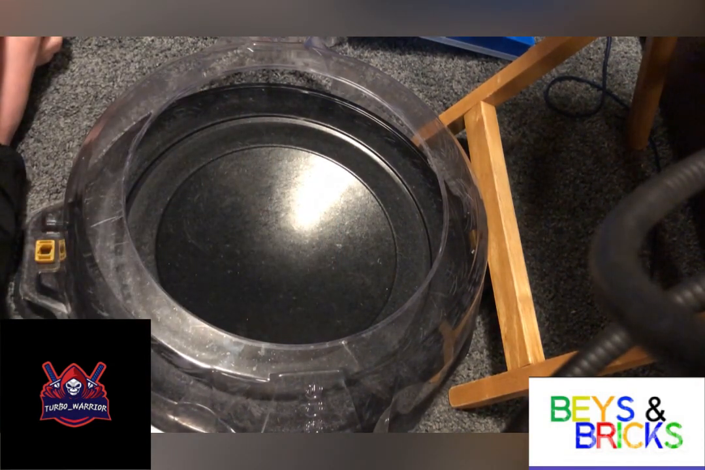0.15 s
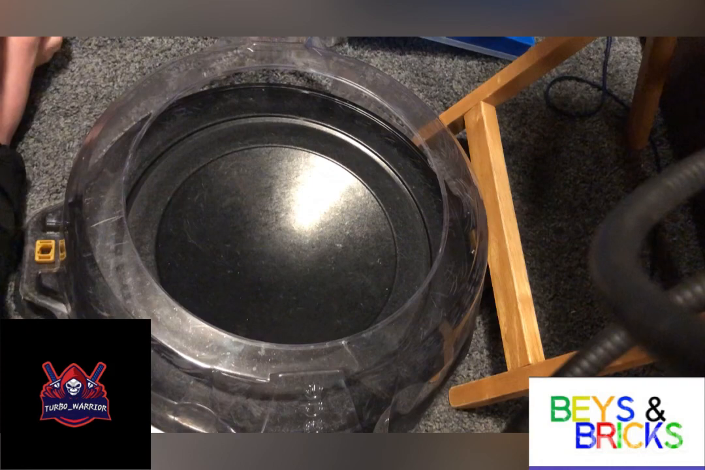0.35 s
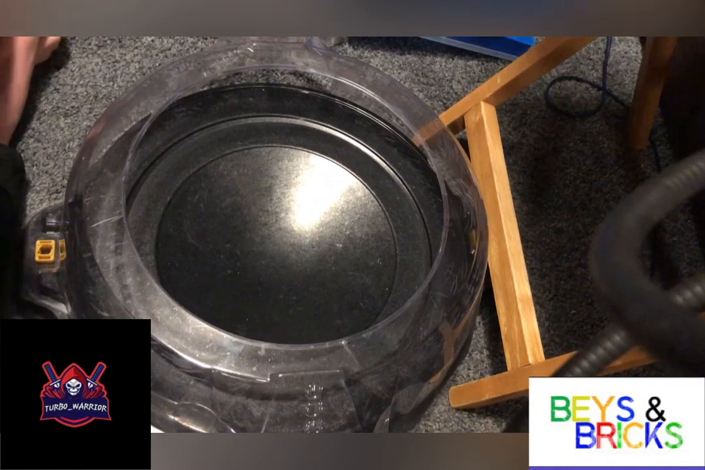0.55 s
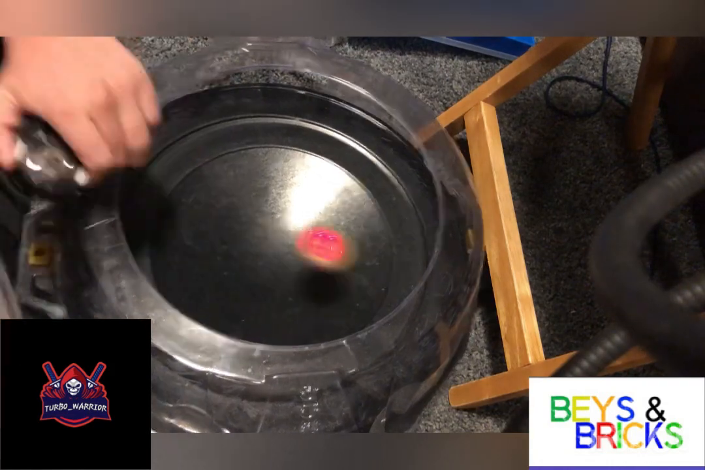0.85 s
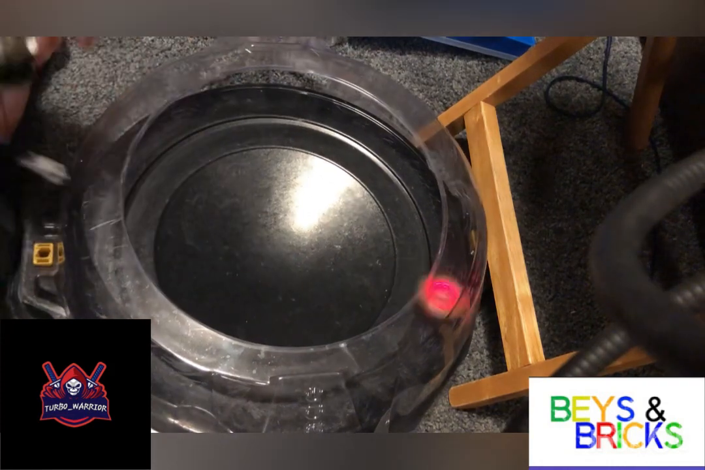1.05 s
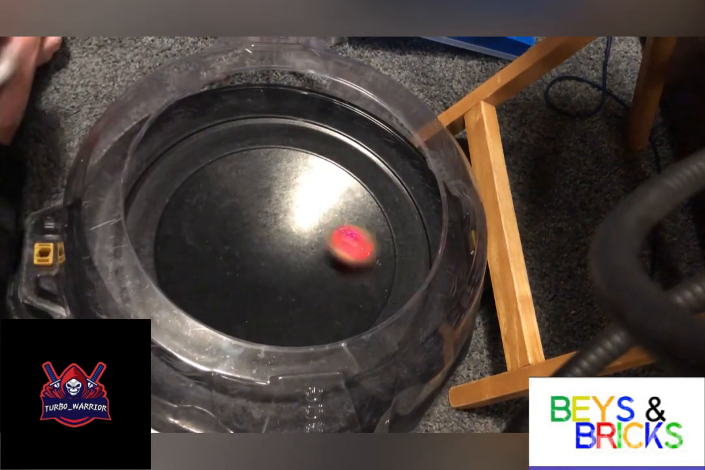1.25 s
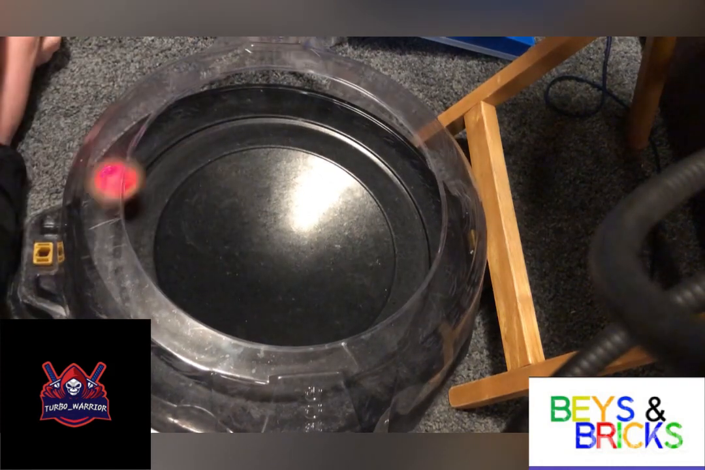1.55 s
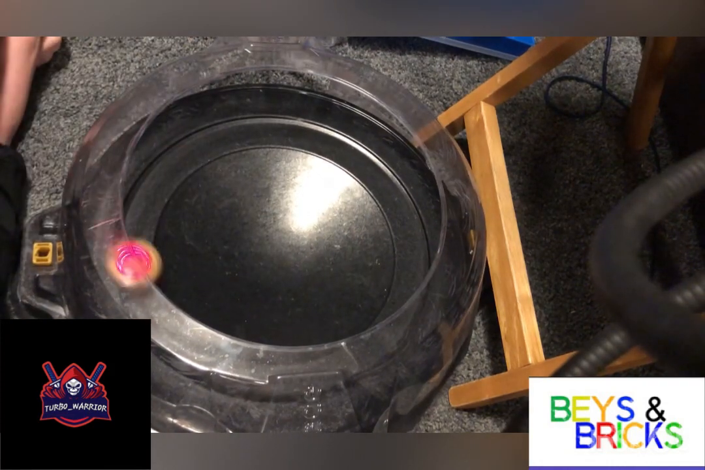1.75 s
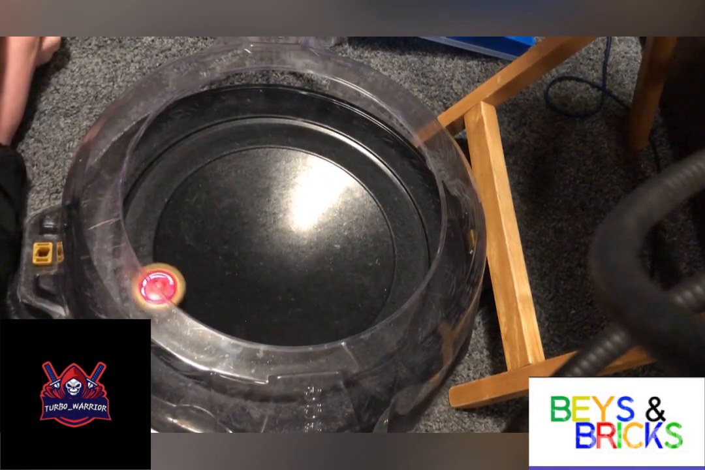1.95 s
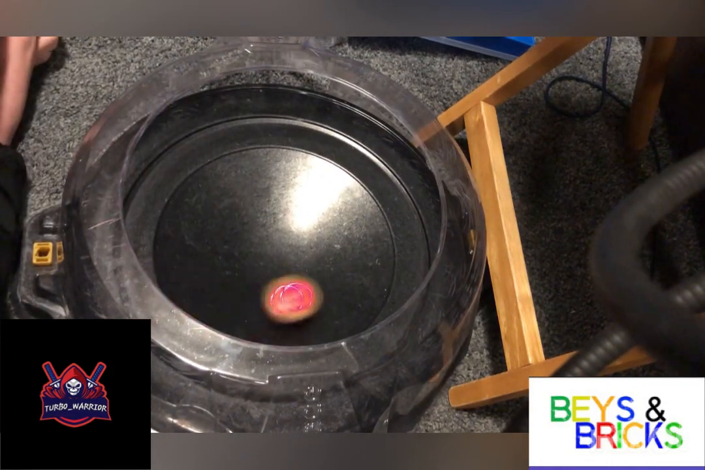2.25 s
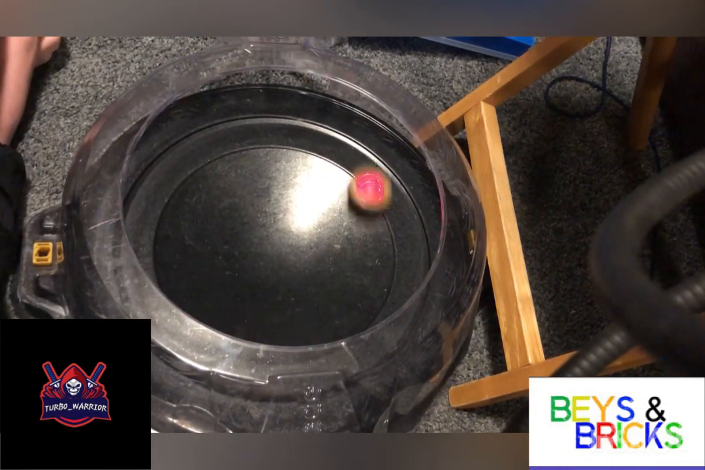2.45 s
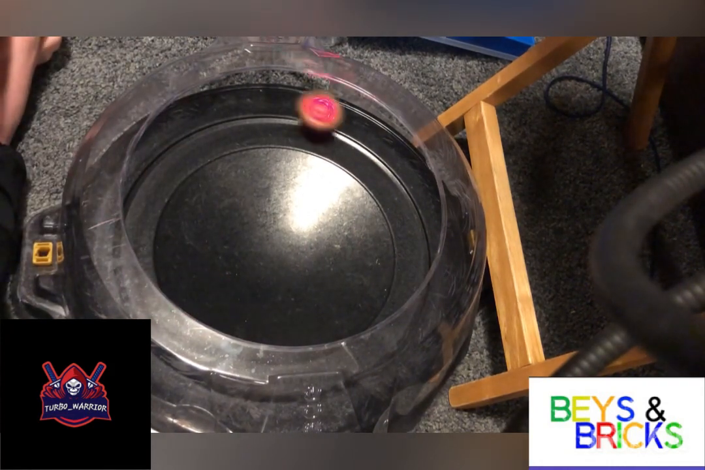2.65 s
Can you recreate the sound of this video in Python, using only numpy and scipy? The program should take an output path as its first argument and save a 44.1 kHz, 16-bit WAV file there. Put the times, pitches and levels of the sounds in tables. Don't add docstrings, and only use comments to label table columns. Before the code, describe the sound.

A single spinning top is clicked onto a launcher, zipped off with a harsh cord rip, bounces loudly in a thin plastic bowl, then circles with ticks and scrapes; quiet room, close microphone, loudest hits distorting.

```python
import sys
import numpy as np
from scipy import signal
from scipy.fft import rfft, irfft
from scipy.io import wavfile
from scipy.ndimage import uniform_filter1d

SR = 44100
rng = np.random.default_rng(int(sys.argv[2]) if len(sys.argv) > 2 else 0)


def field_ratio(decibels):
    return 10 ** (np.asarray(decibels, dtype=float) / 20)


def int16_out(signal):
    q = np.round(np.clip(np.atleast_2d(signal).T, -1, 1) * 32767)
    wavfile.write(sys.argv[1], SR, q.astype(np.int16))


N = 123479

# f/Hz, density/dB
AIR_SPECTRUM = [(15, -61.5), (25, -19.5), (123, -1), (170, -14.5), (293, -9), (531, -16), (12500, -32.5),
                (16000, -40)]
AIR_DB = -59

# t/s, level/dB, pitch f/Hz, contact/s
CLICKS = [(0.012, -19, 3600, 0.014), (0.0226, -2, 3600, 0.0018), (0.0719, -22, 1990, 0.0023),
          (0.105, -23, 3040, 0.0023), (0.123, -27.5, 2090, 0.0037), (0.4986, -25.5, 3120, 0.0046),
          (0.537, -25, 2030, 0.0044), (0.5592, -26, 3300, 0.0062), (0.5684, -18, 3130, 0.0073),
          (0.5878, -18, 2530, 0.012), (0.609, 2.5, 4000, 0.0046), (0.6213, 3, 3480, 0.0018),
          (0.629, 6.5, 3960, 0.0039), (0.7305, 9, 3360, 0.0062), (0.8968, 0, 4160, 0.0026),
          (0.903, -3, 3740, 0.004), (0.9165, -8, 3800, 0.0032), (0.931, 0, 3030, 0.0022),
          (1.17, 13, 5280, 0.0016), (1.2133, -28, 3930, 0.002), (1.921, -26, 2600, 0.003),
          (1.9591, -6.5, 3290, 0.0038), (2.052, -17.5, 3260, 0.0015), (2.0997, -14, 3600, 0.0067),
          (2.178, -21, 3950, 0.0021), (2.224, -25, 4280, 0.0045), (2.4663, -35, 4240, 0.0027)]
CLICK_RING_DB, CLICK_WIDTH_HZ = -0.5, 2300

# f/Hz, T60/s
ROOM_T60 = [(150, 0.18), (4000, 0.33), (12000, 0.17)]
ROOM_DB = -12.5

# t/s, f/Hz, level/dB
SQUEAK = [
    (.592, 8650, -26),
    (.597, 8780, -12.5),
    (.600, 8690, -12),
    (.602, 9250, -2.5),
    (.605, 9640, -15),
    (.609, 9810, -3.5),
    (.613, 10000, 7),
    (.616, 10200, -49.5),
]

# t/s, rasp level/dB, gear teeth f/Hz
PULL = [
    (.606, -46.5, 1406),
    (.622, -28.5, 1850),
    (.655, -11.5, 3180),
    (.672, -10, 3664),
    (.69, -8.5, 5610),
    (.725, -10, 6200),
    (.738, -6, 6150),
    (.748, -42, 6070),
    (.80, -59, 5070),
]
# t/s, level/dB
RUNOUT = [
    (.84, -47),
    (.90, -21),
    (.935, -27.5),
    (.97, -40.5),
    (1.04, -28),
]
# f/Hz, density/dB
RASP_SPECTRUM = [(290, -82), (500, -30.5), (960, -10.5), (1440, -19), (3590, -4), (10400, -4.5),
                 (16000, -12.5)]
# t/s, f/Hz
HOUSING = [
    (.686, 4130),
    (.708, 2550),
    (.714, 3240),
    (.76, 3540),
]
GEAR_DB, GEAR_WIDTH_HZ, GEAR_OFF_S = -3.5, 170, 0.692
PINION_DB, PINION_RATIO, PINION_OFF_S = -5, 0.41, 0.648
COG_BLUR_HZ, CLUMP_DB, HOUSING_DB = 2860, 2, -7
RUNOUT_HZ, RUNOUT_RING_DB = 3600, -1

# t/s, crack level/dB, wall level/dB, drum level/dB, liveliest wall mode f/Hz
BLOWS = [(0.7771, 1.5, -6.5, 5, 565), (0.7951, -6.5, -6, -2, 554), (0.809, -21, -9, -7, 530),
         (0.9741, -10.5, -11, -4.5, 477), (1.0542, 2.5, 2, -16, 2320), (1.058, -15, 1, -20, 1070),
         (1.066, -5.5, -5, -4, 560), (1.142, -37, -21, -18, 423), (1.1785, -34, -18.5, -23, 435),
         (1.226, -25, -24.5, -23, 505), (1.297, -8.5, -43, -27, 2600), (1.3017, -10.5, -53, -21, 2580),
         (1.4743, -28.5, -15.5, -17, 520), (1.523, -11.5, -7.5, -18.5, 670), (1.5279, -11, -11, -38, 980),
         (1.621, -13, -14.5, -24, 630), (1.6322, 4.5, 2, -10.5, 2080), (1.6531, -15, -6.5, -37, 1200),
         (2.045, -53, -26.5, -58, 456), (2.065, -52.5, -25, -56, 485), (2.483, -53, -26, -39, 506),
         (2.493, -48, -26.5, -36, 590), (2.5, -26, -17, -35, 590), (2.531, -36, -29, -37, 1500),
         (2.5325, -25, -23, -18.5, 440), (2.601, -37, -25.5, -25, 586), (2.6141, -13, -11.5, -51, 1340),
         (2.62, -13, -13.5, -32, 1100), (2.631, -37, -16.5, -34, 467), (2.642, -30, -18.5, -40, 535),
         (2.664, -52, -21.5, -48, 440), (2.685, -54, -27.5, -47, 443)]
# f/Hz, level/dB
DRUM_MODES = [(80, -17), (105, -10), (142, -4), (190, -2.5), (230, 2), (290, 5.5), (330, 4.5), (380, 2.5)]
# f/Hz, level/dB
WALL_MODES = [(440, 0), (510, -0.5), (580, 1.5), (650, -10.5), (750, -1.5), (860, -1.5), (1000, 1.5),
              (1115, 6), (1240, 5.5), (1550, -5.5), (1760, -3), (2090, 6), (2280, 6), (2650, -16.5)]
# f/Hz, density/dB
CRACK_SPECTRUM = [(600, -25), (1500, -4.5), (3000, -4.5), (5800, -5.5), (9000, -10.5), (16000, -8)]
CONTACT_S, RATTLE_DB, RATTLE_T60_S = 0.0046, -23.5, 0.018
FOCUS_DB, FOCUS_OCTAVES, DULL_DB_PER_OCTAVE = 7.5, 0.28, 5.5
DRUM_T60_S, DRUM_LAG_CYCLES, DRUM_T60_PER_DB = 0.16, 0.4, 0.031
WALL_T60_S, WALL_LAG_CYCLES, WALL_T60_PER_DB = 0.09, 2.27, 0.34
CLUSTER_SPREAD, HIGH_DIES_FASTER, IN_STEP = 0.05, 0.6, 0.4
CYCLES_TO_RISE, QUICK_CYCLES, LINGERS = 0.62, 2.6, 0.3

# t/s, level/dB
TICKS = [(.831, -4), (.8542, -8.5), (1.0187, -9), (1.047, -4), (1.2386, -14.5), (1.273, -21), (1.293, -17),
         (1.331, -10), (1.352, -7), (1.373, -8), (1.3939, -7), (1.403, -8), (1.4252, -12.5), (1.448, -20),
         (1.47, -23), (1.807, -36), (1.823, -33), (1.9865, -24), (2.3218, -20), (2.333, -15), (2.3458, -12),
         (2.357, -17), (2.37, -14), (2.394, -12.5), (2.417, -24), (2.499, -18.5), (2.5346, -12),
         (2.575, -28), (2.6234, -6), (2.632, -15), (2.6503, -13), (2.672, -30), (2.711, -29.5)]
# t/s, level/dB
GRAZES = [
    (1.479, -15),
    (1.551, -21),
    (1.5722, -17.5),
    (1.588, -28),
    (1.608, -23),
    (1.687, -19),
    (1.706, -17.5),
    (1.728, -19),
    (1.749, -18),
    (2.541, -21),
]
TICK_S, GRAZE_S, TICK_HZ, TICK_RING_DB = 0.0017, 0.0035, 6690, 5

# t/s, roll level/dB, scrape level/dB, wobble level/dB
ROLL = [(.85, -25.5, -35, -52), (.96, -38.5, -56, -67), (1.10, -37, -29.5, -43), (1.26, -41.5, -52, -60),
        (1.32, -32.5, -35, -35.5), (1.44, -30, -38, -36.5), (1.51, -51, -59, -61),
        (1.72, -23.5, -41.5, -46), (1.86, -54, -56, -53), (2.03, -52.5, -49.5, -67.5),
        (2.07, -34.5, -46, -50), (2.22, -42, -48, -48), (2.36, -40, -40.5, -36.5), (2.50, -35, -44.5, -37),
        (2.522, -57, -66, -67), (2.57, -46, -48.5, -49), (2.66, -35.5, -66.5, -48.5),
        (2.8, -53.5, -62, -57)]
# t/s, wall level/dB
WALL_SHARE = [
    (.85, -6),
    (1.5, -3),
    (1.7, -5),
    (2.05, -1),
    (2.35, -1),
    (2.48, 2.5),
]
# f/Hz, density/dB
SCRAPE_SPECTRUM = [(410, -52), (700, -8), (1580, -2.5), (4380, -15), (6830, -14.5), (16000, -23.5)]
# f/Hz, level/dB
TIP_MODES = [(2200, -25), (4150, -10)]
TIP_WIDTH_HZ, SCRAPE_FLOOR = 400, 0.9
SPIN_HZ, SPIN_LOSS_HZ_PER_S = 108.4, 10.5
UNEVEN_DB, ROLL_NOISE = 2.5, 1.2
CHATTER_DB, CHATTER_SPREAD_DB = -29, 3.5
LIMP_DB, LIMP_END_S, WOBBLE_SECOND_DB, WAVER_DB = 4.5, 1.4, 4, 2

MIC_LOW_HZ, EDGE_HZ, CEILING = 59, 15800, 0.99


def evened(x):
    return x / np.sqrt(np.mean(x ** 2) + 1e-20)


def curve(rows, col=1):
    rows = np.array(rows)
    return np.interp(np.arange(N) / SR, rows[:, 0], rows[:, col])


def during(rows):
    t = np.arange(N) / SR
    gate = 1. * (t > rows[0][0]) * (t < rows[-1][0] + .001)
    return uniform_filter1d(gate, size=200)


def coloured(x, points):
    f, db = np.transpose(points)
    bins_hz = np.fft.rfftfreq(len(x), 1 / SR)
    gain = field_ratio(np.interp(np.log(bins_hz + 1), np.log(f + 1), db))
    return irfft(rfft(x) * evened(gain), len(x))


def add(mix, start_s, sound):
    part = mix[round(start_s * SR):][:len(sound)]
    part += sound[:len(part)]


def resonate(x, hz, width_hz):
    turn = np.exp(2j * np.pi * np.cumsum(hz * np.ones(len(x))) / SR)
    r = np.exp(-np.pi * width_hz / SR)
    return 2 * (turn * signal.lfilter([1 - r], [1, -r], x / turn + 1e-18)).real


def resonate_twice(x, hz, width_hz):
    return resonate(resonate(x, hz, width_hz), hz, width_hz)


def burst(contact_s, size=6000):
    t = np.arange(size) / SR / max(contact_s, 1e-4)
    return rng.standard_normal(size) * np.exp(-t) * (1 - np.exp(-4 * t)) ** 2


def air():
    return field_ratio(AIR_DB) * coloured(rng.standard_normal(N), AIR_SPECTRUM)


def clicks():
    out = np.zeros(N)
    for s, db, hz, contact_s in CLICKS:
        spectrum = [(hz / 12, -30), (hz / 3, -7), (hz, 0), (16000, -3.5 * np.log2(16000 / hz))]
        puff = coloured(burst(contact_s, size=2000), spectrum)
        hollow = field_ratio(CLICK_RING_DB) * resonate(puff, hz, CLICK_WIDTH_HZ)
        add(out, s, field_ratio(db - 12.5) * (puff + hollow))
    return out


def room(x, count=3):
    hz, t, z = signal.stft(rng.standard_normal((count, SR // 2)), SR, nperseg=256)
    f, t60 = np.transpose(ROOM_T60)
    t60_s = np.interp(np.log(hz + 1), np.log(f), t60)[:, None]
    tail = signal.istft(z * field_ratio(-60 * t / t60_s), SR, nperseg=256)[1]
    tail = tail * np.minimum(np.arange(tail.shape[1]) / 300, 1)
    cycle = np.arange(N) / 500 + np.arange(count)[:, None] / count
    share = np.cos(2 * np.pi * cycle) * np.sqrt(2 / count)
    echoes = signal.fftconvolve(x * abs(share), tail / np.linalg.norm(tail[0]), axes=1)
    return echoes[:, :N].sum(axis=0)


def squeak():
    tone = np.sin(2 * np.pi * np.cumsum(curve(SQUEAK)) / SR)
    return field_ratio(curve(SQUEAK, col=2)) * tone * during(SQUEAK)


def launcher():
    t = np.arange(N) / SR
    noise = rng.standard_normal((4, N))
    clumps = field_ratio(CLUMP_DB * evened(uniform_filter1d(noise[0], size=120)))
    teeth_hz = curve(PULL, col=2)

    jolts = np.cos(2 * np.pi * np.cumsum(teeth_hz) / SR / 10)
    cogs = 1 + np.exp(-(teeth_hz / COG_BLUR_HZ) ** 2) * jolts
    rasp = evened(coloured(noise[1] * (.5 + cogs ** 2), RASP_SPECTRUM) * clumps)

    whine = np.zeros(N)
    for hz, db, off_s in [(teeth_hz, GEAR_DB, GEAR_OFF_S),
                          (PINION_RATIO * teeth_hz, PINION_DB, PINION_OFF_S),
                          (1.55 * teeth_hz, -10, .685)]:
        engaged = np.clip((off_s - t) / 0.017, .15, 1)
        whine += field_ratio(db) * evened(resonate_twice(noise[2], hz, GEAR_WIDTH_HZ)) * engaged * clumps

    housing = evened(resonate(noise[3], curve(HOUSING), 350))
    housing = field_ratio(HOUSING_DB) * during(HOUSING) * housing
    loose = evened(resonate(noise[3] * clumps, RUNOUT_HZ, 880))
    pull = field_ratio(curve(PULL)) * during(PULL) * (rasp + whine + housing)
    runout = field_ratio(curve(RUNOUT)) * during(RUNOUT) * (rasp + field_ratio(RUNOUT_RING_DB) * loose)
    return pull + runout


def ring(modes, t60_s, lag_cycles, spread_db=2, count=4):
    t = np.arange(9000) / SR
    chance = rng.uniform(-1.18, 1, (len(modes) * count, 3))
    level_chance, pitch_chance, phase_chance = chance.T[:, :, None]
    hz, db = np.repeat(modes, count, axis=0).T[:, :, None]
    t = np.maximum(t - lag_cycles / hz, 0)
    decay_db = 60 * t / t60_s * (hz / np.median(hz)) ** HIGH_DIES_FASTER
    fall = field_ratio(db + spread_db * level_chance - decay_db)
    fall = fall * (LINGERS + (1 - LINGERS) * np.exp(-t * hz / QUICK_CYCLES))
    rise = 1 - np.exp(-t * hz / CYCLES_TO_RISE)
    phase = 2 * np.pi * hz * (1 + CLUSTER_SPREAD * pitch_chance) * t + np.pi * IN_STEP * phase_chance
    x = (fall * rise * np.sin(phase)).sum(axis=0)
    return x / abs(x).max()


def blows():
    out, t = np.zeros(N), np.arange(6000) / SR
    wall_hz, wall_db = np.transpose(WALL_MODES)
    for s, crack_db, knock_db, drum_db, focus_hz in BLOWS:
        rattle = field_ratio(RATTLE_DB - 60 * t / RATTLE_T60_S) * rng.standard_normal(len(t))
        rattle = rattle * (1 - np.exp(-t / 0.00085))
        add(out, s, field_ratio(crack_db) * coloured(burst(CONTACT_S) + rattle, CRACK_SPECTRUM))

        octaves = np.log2(wall_hz / focus_hz)
        lively_db = wall_db + FOCUS_DB * np.exp(-(octaves / FOCUS_OCTAVES) ** 2)
        lively_db = lively_db - DULL_DB_PER_OCTAVE * octaves.clip(0)
        wall_t60_s = WALL_T60_S * field_ratio(WALL_T60_PER_DB * knock_db)
        knock = ring(np.transpose([wall_hz, lively_db]), wall_t60_s, WALL_LAG_CYCLES)
        add(out, s, field_ratio(knock_db) * knock)

        drum_t60_s = DRUM_T60_S * field_ratio(DRUM_T60_PER_DB * drum_db)
        add(out, s + 0.0022, field_ratio(drum_db) * ring(DRUM_MODES, drum_t60_s, DRUM_LAG_CYCLES))
    return out


def tick(contact_s=TICK_S):
    spectrum = [(3000, -28), (6300, 1), (11000, -3), (16000, -8)]
    puff = coloured(burst(contact_s, size=2000), spectrum)
    return puff + field_ratio(TICK_RING_DB) * resonate(puff, TICK_HZ, 580)


def rim_touches():
    out = np.zeros(N)
    for s, db in TICKS:
        add(out, s, field_ratio(db - 10) * tick())
    for s, db in GRAZES:
        add(out, s, field_ratio(db - 8.5) * tick(GRAZE_S))
    return out


def rolling():
    t = np.arange(N) / SR
    turns = np.cumsum(SPIN_HZ - SPIN_LOSS_HZ_PER_S * t) / SR
    turn_number = turns.astype(int)
    strength = field_ratio(UNEVEN_DB * np.clip(rng.standard_normal((2, 400)), -2, 1.5))[:, turn_number]
    nudges = strength[0] * (np.diff(np.floor(turns), prepend=0) > 0)

    drive = evened(nudges) + ROLL_NOISE * rng.standard_normal(N)
    floor = sum(field_ratio(db) * resonate_twice(drive, hz, 61.6) for hz, db in DRUM_MODES)
    wall = sum(field_ratio(db - 17.5 * np.log2(hz / 500)) * resonate_twice(drive, hz, 99) for hz, db in WALL_MODES)
    bowl = evened(floor) + field_ratio(curve(WALL_SHARE)) * evened(wall)

    throb = SCRAPE_FLOOR + strength[1] * np.exp(-(turns % 1) / 0.26)
    scrape = evened(coloured(throb * rng.standard_normal(N), SCRAPE_SPECTRUM))
    scrape = scrape + sum(field_ratio(db) * evened(resonate(scrape, hz, TIP_WIDTH_HZ)) for hz, db in TIP_MODES)

    touches = (nudges > 0) * field_ratio(CHATTER_SPREAD_DB * rng.exponential(1, N).clip(0, 3))
    chatter = sum(signal.oaconvolve(touches * (turn_number % 2 == k), tick())[:N] for k in (0, 1))
    scrape = scrape + field_ratio(CHATTER_DB) * chatter * 10

    limp = field_ratio(LIMP_DB) * np.sin(3 * np.pi * turns)
    second = field_ratio(WOBBLE_SECOND_DB) * np.sin(4 * np.pi * turns + 0.2)
    wobble = np.sin(2 * np.pi * turns) + np.where(np.arange(N) < LIMP_END_S * SR, limp, second)
    waver = uniform_filter1d(uniform_filter1d(rng.standard_normal(N), size=900), size=900)
    wobble = wobble * field_ratio(WAVER_DB * evened(waver))

    parts = field_ratio(curve(ROLL)) * bowl
    parts = parts + field_ratio(curve(ROLL, col=2)) * scrape
    parts = parts + field_ratio(curve(ROLL, col=3)) * wobble
    return parts * (np.arange(N) > ROLL[0][0] * SR)


def scene():
    near = clicks() + launcher() + blows() + rim_touches() + rolling()
    slip = squeak()
    return (near + field_ratio(ROOM_DB) * room(near + 0.23 * slip) + slip + air())[None]


def band_limit(x):
    return signal.sosfilt(signal.butter(12, 16400, fs=SR, output="sos"), x)


def record(dry):
    high_pass = signal.butter(3, MIC_LOW_HZ, "high", fs=SR, output="sos")
    thin = signal.sosfilt(high_pass, dry)
    thin = signal.oaconvolve(thin, signal.firwin(255, EDGE_HZ, fs=SR)[None], "same")
    return band_limit(np.clip(thin, -CEILING, CEILING))


dry = scene()
out = record(dry)
int16_out(out)
```